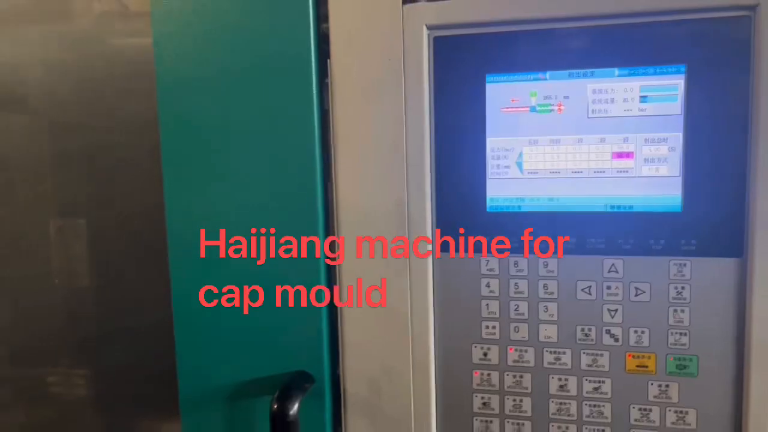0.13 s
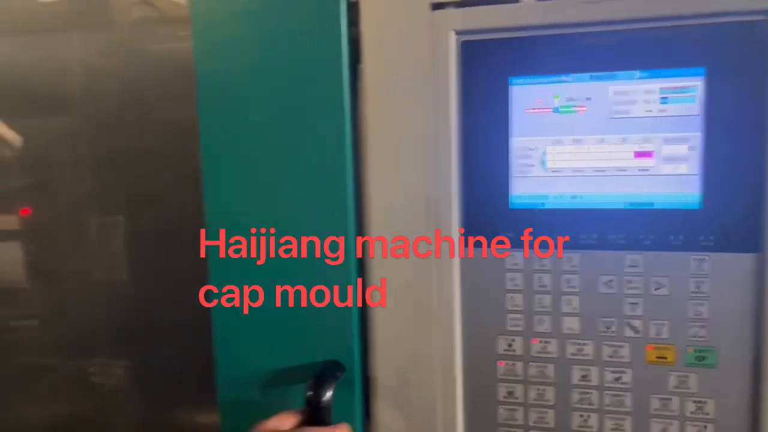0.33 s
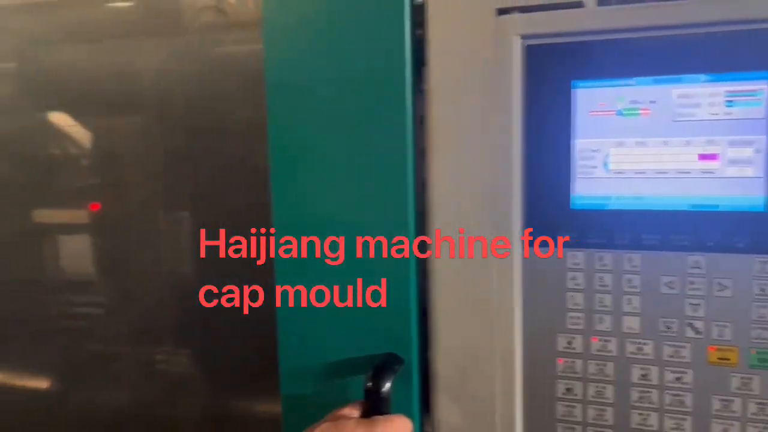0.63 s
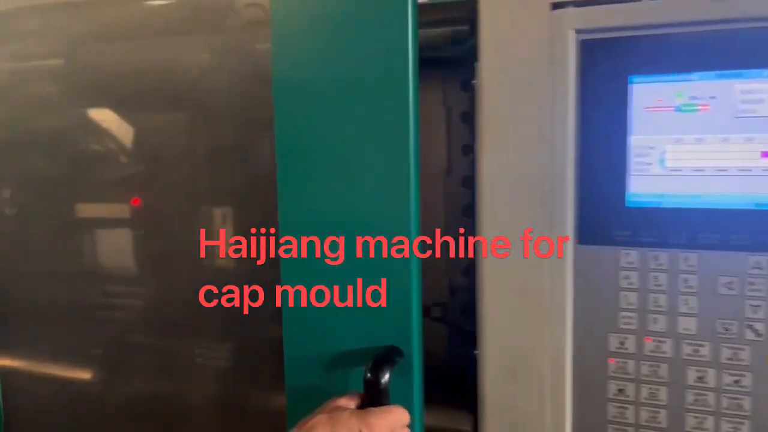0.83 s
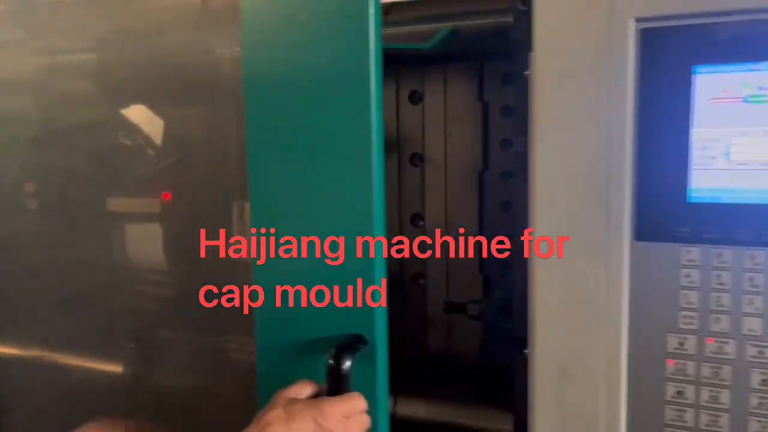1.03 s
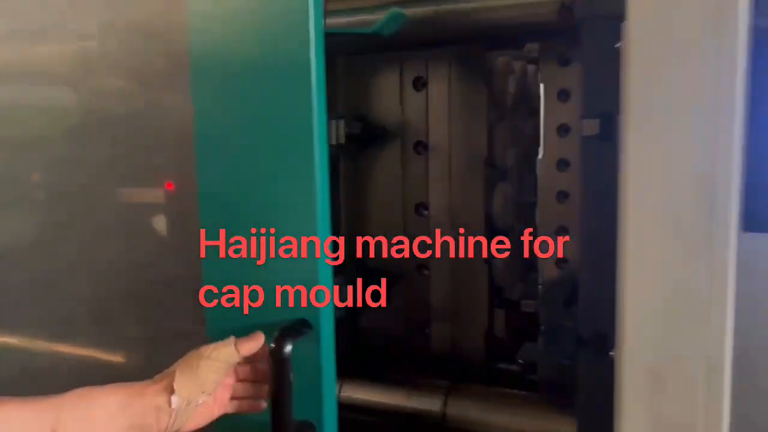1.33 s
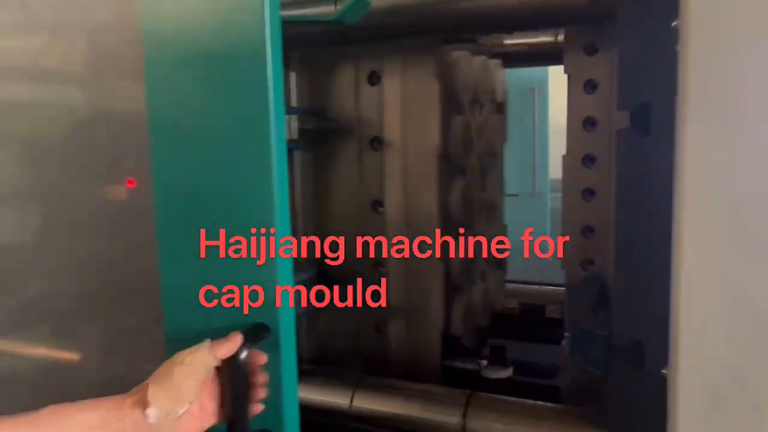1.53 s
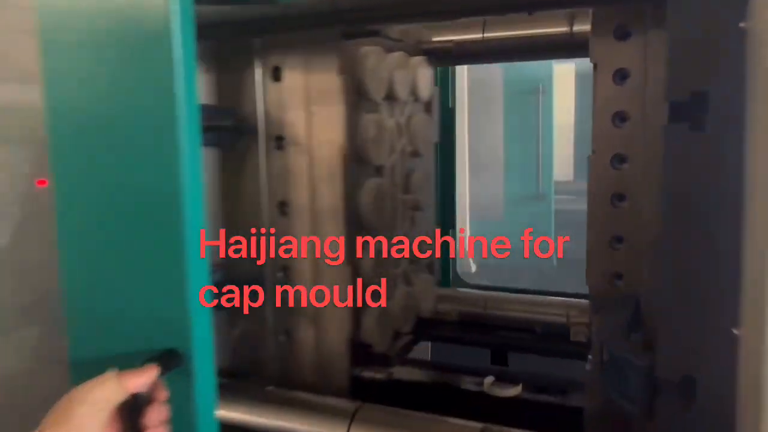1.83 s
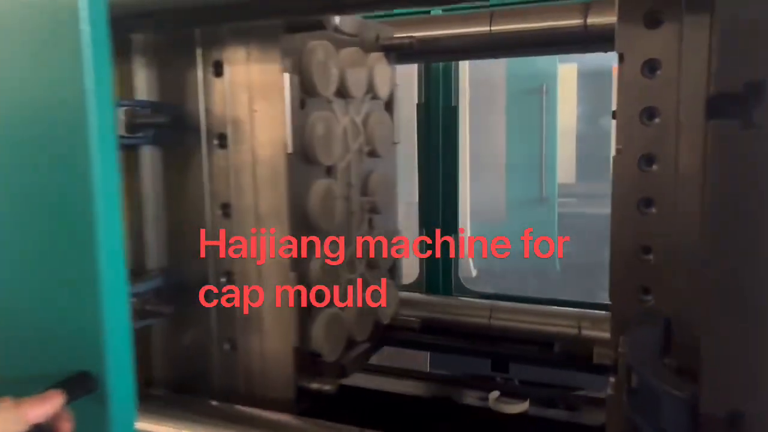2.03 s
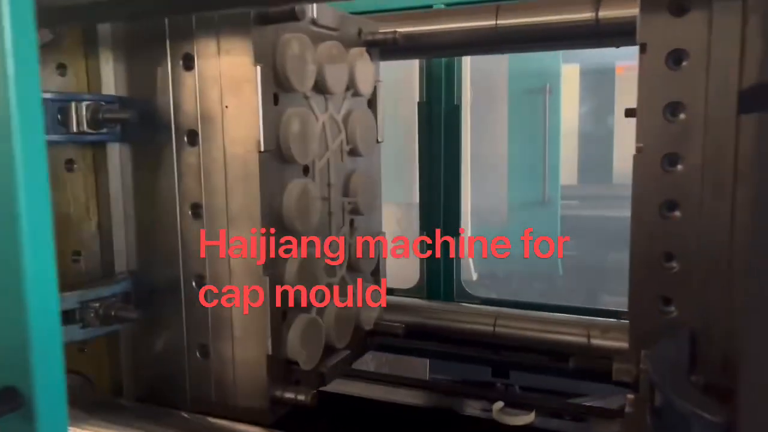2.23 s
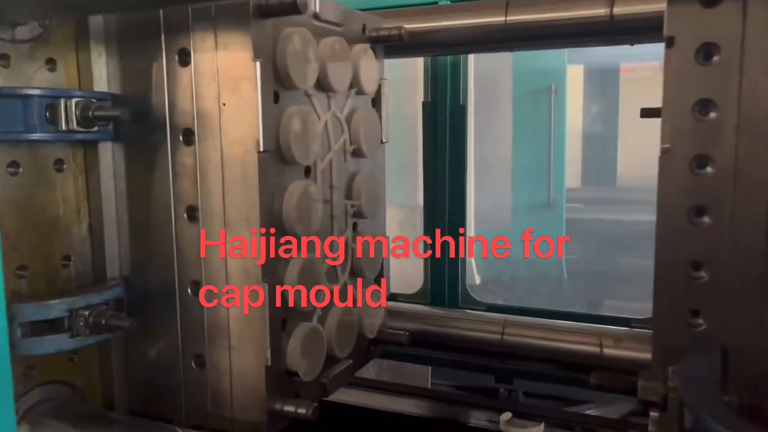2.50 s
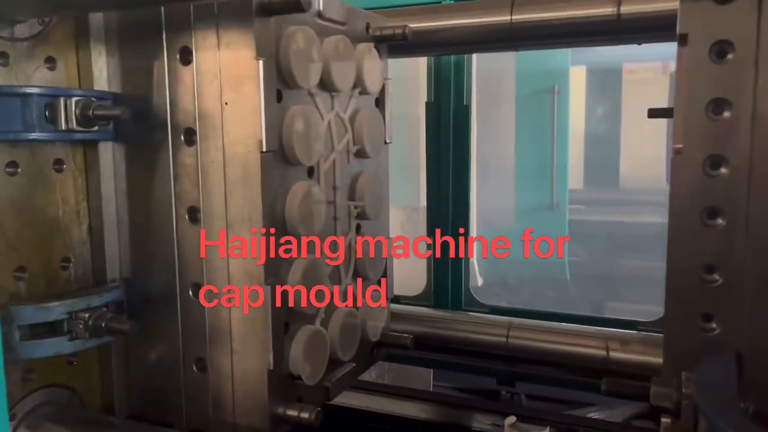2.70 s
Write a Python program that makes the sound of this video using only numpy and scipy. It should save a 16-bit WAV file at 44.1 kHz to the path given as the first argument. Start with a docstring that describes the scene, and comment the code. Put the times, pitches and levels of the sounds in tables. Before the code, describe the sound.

Close handheld stereo pickup in a humming factory hall: a dull bump, then a sliding metal door rumbles, rattles and bangs open on rollers, machine noise grows clearer, and finally a breathy jet of air bursts in.

```python
"""The sheet-metal guard door of a moulding machine is pulled open in a humming factory hall.
Its jolted panel clatters as decaying noise and rings as damped, beating modes; the frame booms under bumps.
Rollers rumble and hiss as coloured noise and squeal as gliding tones; the machine grows clearer.
At the end a rush of air sets in: a fluttering noise jet, narrow noisy resonances and a whistle."""
import sys
import numpy as np
from scipy import signal
from scipy.io import wavfile

SR = 44100
rng = np.random.default_rng(int(sys.argv[2]) if len(sys.argv) > 2 else 0)


def log_audio(samples):
    """Write samples as a 16-bit WAV file to the path given in sys.argv[1]."""
    # one column per channel
    frames = np.atleast_2d(samples).T
    # limit to full scale, then quantise
    limited = np.clip(frames, -1, 1)
    pcm = np.round(limited * 32767).astype(np.int16)
    wavfile.write(sys.argv[1], SR, pcm)


N = 126126
T = np.arange(N) / SR

# Jolts of the door: start_s, level_db, rise_s, presence_db, sparkle_db, favoured_mode_hz, mode_lift_db
JOLTS = [(0.523, -31.5, 0.012, 6, 8, 1420, 22), (0.816, -34, 0.0046, 9.5, 7, 2730, 21),
         (.963, -27, 0.0045, 5.5, 13, 1900, -1), (.976, -20.5, 0.0048, 10, 12, 1820, 10),
         (1.003, -29, 0.0015, 16, 20, 3860, 2), (1.019, -27, .001, -15, -7, 2440, 1),
         (1.115, -38.5, .005, 12.5, 26.5, 3900, -6), (1.402, -19.5, 0.0023, 3.5, 0, 2160, 9.5),
         (1.416, -27.5, .004, -12, 3, 1330, 6), (1.472, -25.5, 0.0021, -10, 3, 1254, 4.5),
         (1.596, -14, 0.0034, -2, 0.5, 1310, 1), (1.643, -26, 0.0058, -16, -2, 885, 10),
         (1.687, -27.5, 0.0027, 3, 4, 2600, 10), (1.770, -16.5, 0.0009, -0.5, 6, 2350, -1),
         (1.796, -23, 0.0013, -23, -12, 874, 10), (1.883, -34.5, 0.0092, -11, 3, 1816, 22),
         (1.967, -14, 0.00071, -6, 8.5, 2420, 0)]
# Modes of the door panel: pitch_hz, relative_level_db, t60_s
PANEL_MODES = [(811, -18, 0.99), (890, -6.5, 0.4), (918.3, -11, 0.69), (1221, -11, 0.45), (1299, -6, 0.5),
               (1323, -7.5, 0.4), (1483, -13, 0.47), (1850, -11.5, 0.35), (1928, -7, 0.24),
               (2155, -16, 0.074), (2324, -9.5, 0.25), (2520, -3, 0.12), (2570, -9, 0.24),
               (2915, -12.5, 0.11), (3890, -18.5, 0.2)]
# Spectrum of the panel's dense clatter: frequency_hz, relative_density_db
CLATTER_SPECTRUM = [(200, -7), (650, -11), (900, 4), (1400, 2), (2600, -3), (3400, -5.5), (6000, -12),
                    (10000, -21), (15000, -21.5)]
# Dull bumps of the door frame: start_s, level_db, tilt_db_per_octave (about 200 Hz)
FRAME_BUMPS = [(0.173, -15, -1), (0.539, -24.5, 4), (0.774, -38, 8), (0.96, -22, -4.5), (1.247, -22, 2.5),
               (2.08, -26, 2.5)]
# Spectrum of the frame: frequency_hz, relative_density_db
FRAME_SPECTRUM = [(35, -41), (100, 0.5), (250, -11), (560, -11.5), (850, -20.5), (1400, -21.5), (3000, -69)]
# Rumble of the rollers over time: time_s, level_db
RUMBLE_LEVEL = [(.03, -45), (.42, -29), (.6, -25.5), (.86, -25.5), (1.0, -19), (1.12, -22), (1.22, -24),
                (1.35, -27), (1.48, -28.5), (1.95, -35.5), (2.25, -24.5), (2.55, -63)]
# Spectrum of the rumble: frequency_hz, relative_density_db
RUMBLE_SPECTRUM = [(45, 6), (75, 1.5), (150, -0.5), (300, -7.5), (500, -14), (700, -28), (2000, -34),
                   (15000, -51)]
# Hiss of the rail over time: time_s, level_db
HISS_LEVEL = [(.03, -45), (.36, -45), (.54, -34.5), (.76, -35.5), (.92, -44), (1.25, -40.5), (1.9, -42.5),
              (2.3, -44), (2.86, -52)]
# Spectrum of the rail hiss: frequency_hz, relative_density_db
HISS_SPECTRUM = [(1000, 3.5), (3000, -3), (4400, 4.5), (7000, -1), (11500, 6), (15000, -16)]
# Spells in which the rollers groan, sing and squeak: start_s, length_s, start_hz, end_hz, level_db
SQUEAL_SPELLS = [(0.425, 0.21, 4350, 4100, -44), (0.607, .19, 4030, 4680, -46),
                 (0.654, .16, 5750, 6800, -41), (1.255, 0.29, 505, 523, -28), (1.514, .17, 258.2, 265, -30),
                 (1.605, 0.26, 531, 557, -34), (1.772, 0.11, 274, 278, -28),
                 (1.852, 0.18, 545.5, 573, -38.5), (2.023, .13, 460, 452.6, -28.5)]
# Flow of the air rush over time: time_s, level_db, treble_db
AIR_FLOW = [(2.6, -63, 1), (2.63, -30.5, 7.5), (2.68, -19.5, -1), (2.73, -16.5, -4), (2.79, -19.5, -2.5),
            (2.86, -19, -6.5)]
# Spectrum of the air jet: frequency_hz, relative_density_db
AIR_SPECTRUM = [(300, -9), (700, -16), (1050, 0), (1600, -5), (2500, -3), (3500, -7.5), (4400, -9),
                (6000, -15.5), (10000, -18.5), (15000, -60)]
# Hollow resonances of the air rush: pitch_hz, relative_level_db
AIR_RESONANCES = [(1064, -13), (1128, -11), (1335, -15), (1665, -15.5), (1855, -11), (2070, -10.5),
                  (2393, -8.5), (2790, -13), (2995, -14), (4400, -14)]
# Machine noise through the widening gap over time: time_s, level_db
MACHINE_LEVEL = [(.03, -40), (.7, -38), (1.2, -28.5), (1.7, -31), (2.25, -29.5), (2.6, -29.5),
                 (2.86, -31.5)]
# Spectrum of the machine noise: frequency_hz, relative_density_db
MACHINE_SPECTRUM = [(200, 16), (450, -23), (650, 4.5), (1200, 4.5), (2400, 0), (3300, -3), (4700, -4),
                    (7000, -20.5), (15000, -71)]
# Spectrum of the hall's drone: frequency_hz, relative_density_db
HALL_SPECTRUM = [(45, -13), (85, -1), (190, -7), (300, -3.5), (450, -6.5), (700, -26.5), (1100, -16.5),
                 (2500, -33.5), (5400, -31), (7300, -37), (10000, -42), (12500, -28), (15000, -43)]
# Stereo image by frequency: frequency_hz, left_right_correlation, left_minus_right_db
STEREO_IMAGE = [(100, 0.99, -0.5), (250, 0.89, -2), (493, 0.32, -0.3), (980, 0, -2.5), (2120, 0.33, 0.1),
                (4040, 0.47, 4.5), (7050, 0, 1), (12300, 0.42, -0.5)]

# Clatter; t60 values in seconds
CLATTER_DB, CLATTER_T60_S, TICK_T60_S = -4, 0.19, 0.14  # the tick is the treble part
CRACK_DB, CRACK_T60_S = -7.5, 0.04  # the first contact of a jolt
TAIL_DB, TAIL_T60_S, TAIL_TOP_LOSS_DB = -7.5, 0.57, 15.5
RATTLES_PER_S, RATTLE_DECAY_S, RATTLE_SHARE = 250, 0.0032, 0.24
# Ringing modes
RING_DB, FAVOUR_OCTAVES, BLOOM_CYCLES = -0.5, 0.051, 8.9
OVERTONE_RANGE_HZ, OVERTONE_DB, OVERTONE_T60_S = (954, 6940), -23.5, 0.42
BEAT_SPREAD_HZ, BEAT_SHARE, PARTNER_T60_S = 23, 1, 0.17
MODE_SPREAD_DB, JOLT_SHIFT_HZ, MODE_PHASE_SPREAD_RAD, MODE_PAN_DB = 2.5, 7.95, 0.72, -2
# Frame and rollers
BUMP_RISE_S, BUMP_T60_S = 0.0046, 0.3
SQUEAL_BLUR = 0.044  # drift rate as a share of pitch
SQUEAL_WAVER_DB, SQUEAL_CLEAR_HZ = 4.5, 960  # spells below this pitch are mostly clear
# Air rush
AIR_NOISE_DB, AIR_TREBLE_PAN_DB = 1, 1
RESONANCE_WIDTH_HZ = 12  # lower limit; higher resonances are broader
WHISTLE_HZ, WHISTLE_DB, WHISTLE_FOLLOWS = 1480, -5, 0.99  # added dB per dB of flow
# Hall and microphone
HALL_DB = -29.5
DIP_HZ, DIP_DB = (7397, 9700), -33
START_S, LOW_CUT_HZ, HIGH_CUT_HZ = 0.035, 50.7, 14600


def clatter():
    """Impact excitation of many dense modes: a crack, a grainy body and a tail, with faster treble loss."""
    presence_db, sparkle_db = np.transpose(JOLTS)[3:5]

    def envelopes(t60_s):
        return np.array([from_db(db) * blow(s, rise_s, t60_s) for s, db, rise_s, *_ in JOLTS])

    crack, body = envelopes(CRACK_T60_S), envelopes(CLATTER_T60_S)
    tail, tick = envelopes(TAIL_T60_S), envelopes(TICK_T60_S)
    grain, out = rattle(), 0
    for hz, band in bands(CLATTER_SPECTRUM, flicker_db=1.5):
        gain = from_db(contact_colour(presence_db, sparkle_db, hz))
        top = treble(hz) ** 2
        envelope = from_db(CRACK_DB) * (gain @ crack)
        envelope = envelope + grain * ((1 - top) * (gain @ body) + top * (gain @ tick))
        envelope = envelope + from_db(TAIL_DB - TAIL_TOP_LOSS_DB * top) * (gain @ tail)
        out = out + band * envelope
    return from_db(CLATTER_DB) * out


def panel_ring():
    """Modal superposition: low modes bloom later, and each mode beats against a short-lived partner."""
    # weak overtones fill in among the panel's modes
    overtone_hz = np.geomspace(*OVERTONE_RANGE_HZ, 30) * np.exp(0.02 * rng.standard_normal(30))
    overtones = [(hz, OVERTONE_DB + at_hz(CLATTER_SPECTRUM, hz), OVERTONE_T60_S) for hz in overtone_hz]
    hz, mode_db, t60_s = np.transpose(PANEL_MODES + overtones)
    t, out = T[:SR // 2], np.zeros((2, N))
    bloom = np.minimum(hz[:, None] * t / BLOOM_CYCLES, 1)

    def damped(pitch_hz, decay_s):
        return bloom * np.exp((2j * np.pi * pitch_hz - np.log(1000) / decay_s)[:, None] * t)

    modes = damped(hz, t60_s)
    partners = damped(hz + BEAT_SPREAD_HZ * rng.standard_normal(len(hz)), PARTNER_T60_S)
    unlike = np.sqrt(1 - at_hz(STEREO_IMAGE, hz))
    pan_db = at_hz(STEREO_IMAGE, hz, axis=2)
    for s, db, rise_s, presence_db, sparkle_db, favoured_hz, lift_db in JOLTS:
        octaves_away = np.log2(hz / favoured_hz)
        colour_db = mode_db + contact_colour(presence_db, sparkle_db, hz)
        colour_db += lift_db * np.exp(-0.5 * (octaves_away / FAVOUR_OCTAVES) ** 2)
        ringing = 0
        for share, tones in (1, modes), (BEAT_SHARE, partners):
            strength, apart, lean = rng.standard_normal((3, len(hz)))
            level = share * from_db(RING_DB + db + colour_db + MODE_SPREAD_DB * strength)
            phase_gap = MODE_PHASE_SPREAD_RAD * unlike * apart * [[0.5], [-0.5]]
            phase = 2 * np.pi * rng.random(len(hz)) + phase_gap
            amplitude = level * panned(pan_db + MODE_PAN_DB * lean)
            ringing = ringing + (amplitude * np.exp(1j * phase)) @ tones
        # one common pitch shift for each jolt
        shift = np.exp(2j * np.pi * JOLT_SHIFT_HZ * rng.standard_normal() * t)
        stroke = (ringing * shift).real * np.minimum(t / rise_s, 1)
        i = int(s * SR)
        out[:, i:i + len(t)] += stroke[:, :N - i]
    return out


def contact_colour(presence_db, sparkle_db, hz):
    """Contact stiffness: a harder contact lifts the upper middle and the top; result in dB."""
    presence = at_hz([(2400, 0), (3800, 1), (5000, 1), (10000, 0)], hz)
    sparkle = at_hz([(5000, 0), (10000, 1)], hz)
    return presence_db * presence + sparkle_db * sparkle


def rattle():
    """Intermittent contact: random decaying grains modulate a steady part, as a gain of rms 1."""
    contacts = (rng.random(N) < RATTLES_PER_S / SR) * rng.uniform(0.45, 1, N)
    grains = signal.lfilter([1], [1, -np.exp(-1 / (RATTLE_DECAY_S * SR))], contacts)
    return rms_one(1 - RATTLE_SHARE + RATTLE_SHARE * rms_one(grains))


def door_bumps():
    """Soft impact on a damped body: blows scuff and boom in the frame as decaying noise."""
    body = np.array([from_db(db) * blow(s, BUMP_RISE_S, BUMP_T60_S) for s, db, _ in FRAME_BUMPS])
    tilt_db = np.array(FRAME_BUMPS)[:, 2]
    out = 0
    for hz, band in bands(FRAME_SPECTRUM, flicker_db=2.5):
        gain = from_db(tilt_db * np.log2(hz / 200))
        out = out + band * (gain @ body)
    return rattle() * out


def rollers():
    """Rolling and sliding friction: broadband rumble and hiss, with the rollers' squeals."""
    rumble = from_db(in_time(RUMBLE_LEVEL)[0]) * noise(RUMBLE_SPECTRUM, flicker_db=0.5)
    hiss = from_db(in_time(HISS_LEVEL)[0]) * noise(HISS_SPECTRUM, flicker_db=2.0)
    return rumble + hiss + squeals()


def squeals():
    """Frictional self-oscillation: low spells are wavering tones, high ones diffuse narrow noise."""
    out = 0
    for s, length_s, start_hz, end_hz, db in SQUEAL_SPELLS:
        along = np.clip((T - s) / length_s, 0, 1)
        hz = start_hz + (end_hz - start_hz) * along
        tone = from_db(SQUEAL_WAVER_DB * drift(28)) * np.sin(2 * np.pi * np.cumsum(hz) / SR)
        diffuse = narrow(hz, SQUEAL_BLUR * start_hz)
        voice = rms_one(rms_one(tone) + (start_hz / SQUEAL_CLEAR_HZ) ** 2 * diffuse)
        swell = np.sqrt(np.abs(np.sin(np.pi * along)))
        out = out + from_db(db) * swell * voice
    return out


def air_rush():
    """Turbulent flow: a fluttering jet with hollow resonances and a whistle, its treble to the left."""
    flow_db, treble_db = in_time(AIR_FLOW)
    jet = 0
    for hz, band in bands(AIR_SPECTRUM, flicker_db=1.0):
        jet = jet + band * from_db(treble_db * treble(hz)) * panned(AIR_TREBLE_PAN_DB * treble(hz))
    resonances = 0
    for hz, db in AIR_RESONANCES:
        width_hz = RESONANCE_WIDTH_HZ * (1 + (hz / 2000) ** 2)
        resonances = resonances + from_db(db) * narrow(hz, width_hz)
    # the whistle swells faster than the flow
    whistle_db = WHISTLE_DB + WHISTLE_FOLLOWS * (flow_db - flow_db.max()) + 3.0 * drift(30)
    whistle_phase = 2 * np.pi * np.cumsum(WHISTLE_HZ + 4 * drift(25)) / SR
    whistle = from_db(whistle_db) * np.sin(whistle_phase)
    flutter_db = 0.48 * drift(90)
    return from_db(flow_db + flutter_db) * (from_db(AIR_NOISE_DB) * jet + resonances + whistle)


def factory():
    """Transmission through an opening: machine noise varies with the gap over the hall's steady drone."""
    machine = from_db(in_time(MACHINE_LEVEL)[0]) * noise(MACHINE_SPECTRUM, flicker_db=0.2)
    return machine + from_db(HALL_DB) * noise(HALL_SPECTRUM, flicker_db=2.43)


def blow(s, rise_s, t60_s):
    """Impact and damping: a linear rise, then exponential decay by 60 dB in t60_s."""
    rise = np.clip((T - s) / rise_s, 0, 1)
    return rise * from_db(-60 * np.maximum(T - s - rise_s, 0) / t60_s)


def narrow(hz, width_hz):
    """Noise-fed resonance: random quadrature amplitudes on a carrier, partly shared by the channels."""
    phase = 2 * np.pi * np.cumsum(hz + 0 * T) / SR
    shared, left, right = [
        drift(width_hz) * np.cos(phase) + drift(width_hz) * np.sin(phase) for _ in range(3)]
    return rms_one(shared + 2.7 * np.array([left, right]))


def bands(spectrum, flicker_db):
    """Band decomposition: stereo noise as (Hz, third-octave band) pairs, of total rms 1."""
    edges = np.geomspace(22, 16000, 29)
    white = rng.standard_normal((2, 2, N))  # neighbouring bands take independent noise
    out = []
    for k, (low, high) in enumerate(zip(edges, edges[1:])):
        band_filter = signal.butter(2, [low, high], "band", fs=SR, output="sos")
        mid, side = signal.sosfilt(band_filter, white[k % 2])
        hz = np.sqrt(low * high)
        alike = at_hz(STEREO_IMAGE, hz)
        stereo = np.sqrt(1 + alike) * mid + np.sqrt(1 - alike) * side * [[1], [-1]]
        gain = from_db(at_hz(spectrum, hz) + flicker_db * drift(13.6))
        out.append((hz, gain * panned(at_hz(STEREO_IMAGE, hz, axis=2)) * stereo))
    total = np.sqrt(sum(np.mean(band ** 2) for _, band in out))
    return [(hz, band / total) for hz, band in out]


def noise(spectrum, flicker_db):
    """Superposition of bands: coloured stereo noise of rms 1."""
    return sum(band for _, band in bands(spectrum, flicker_db))


def drift(rate_hz):
    """Low-pass random process: slow chance of rms 1, computed at every 40th sample."""
    r = np.exp(-2 * np.pi * rate_hz * 40 / SR)
    white = rng.standard_normal(N // 40 + 2002)
    slow = signal.lfilter([1], [1, -2 * r, r * r], white)[2000:]  # skip the filter's settling
    return np.interp(np.arange(N) / 40, np.arange(len(slow)), rms_one(slow))


def treble(hz):
    """Spectral weighting: how much a frequency counts as treble, from 0.12 to 0.93."""
    return at_hz([(2000, 0.12), (4000, 0.93)], hz)


def panned(db):
    """Level-difference stereo: left and right gains, db apart."""
    return from_db(np.array([[0.5], [-0.5]]) * db)


def at_hz(points, hz, axis=1):
    """Logarithmic pitch scale: one column of a spectrum read at hz."""
    points = np.array(points)
    return np.interp(np.log(hz), np.log(points[:, 0]), points[:, axis])


def in_time(rows):
    """Linear interpolation: each column of a time curve at every sample."""
    s, *columns = np.transpose(rows)
    return [np.interp(T, s, column) for column in columns]


def from_db(db):
    """Logarithmic level: decibels to amplitude gain."""
    return 10 ** (np.asarray(db) / 20)


def rms_one(x):
    """Mean power: scale to unit rms."""
    return x / np.sqrt(np.mean(x ** 2) + 1e-20)


def scene():
    """Linear superposition of door, air and hall."""
    return clatter() + panel_ring() + door_bumps() + rollers() + air_rush() + factory()


def record(dry):
    """Band-limited reception: a microphone with a treble dip, a delayed start, and bass and top cuts."""
    notched = signal.sosfilt(signal.butter(5, DIP_HZ, "bandstop", fs=SR, output="sos"), dry)
    dip = signal.sosfilt(signal.butter(5, DIP_HZ, "bandpass", fs=SR, output="sos"), dry)
    heard = (notched + from_db(DIP_DB) * dip) * (T > START_S)
    heard = signal.sosfilt(signal.butter(4, LOW_CUT_HZ, "highpass", fs=SR, output="sos"), heard)
    # order 10, ripple 0.3 dB, stopband 90 dB down
    return signal.sosfilt(signal.ellip(10, 0.3, 90, HIGH_CUT_HZ, fs=SR, output="sos"), heard)


dry = scene()
out = record(dry)
log_audio(out)
```